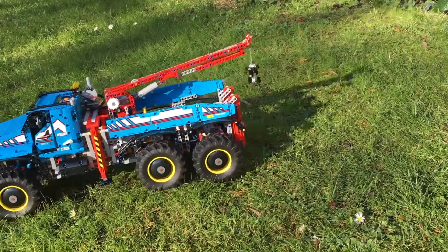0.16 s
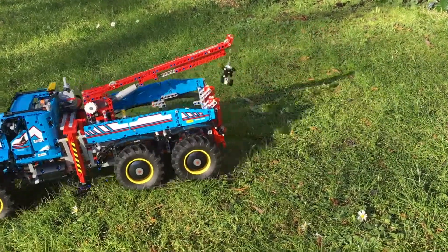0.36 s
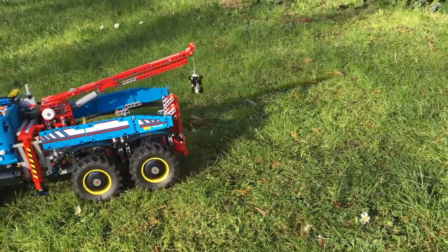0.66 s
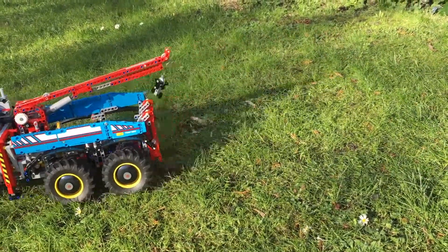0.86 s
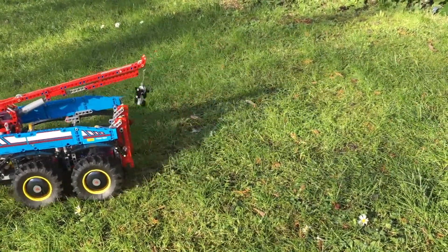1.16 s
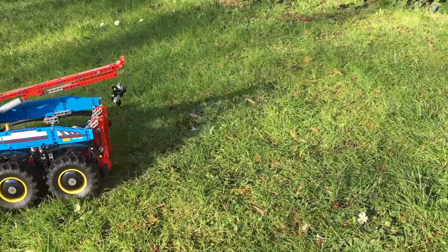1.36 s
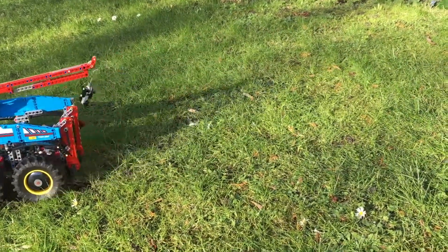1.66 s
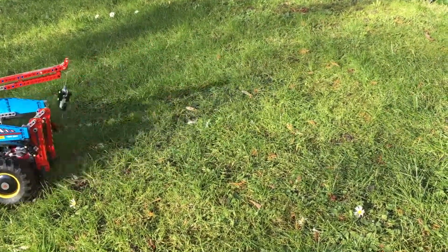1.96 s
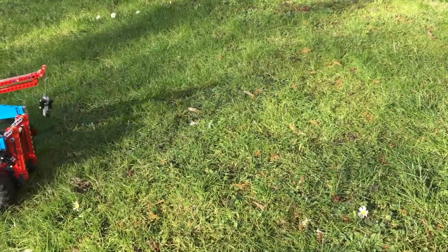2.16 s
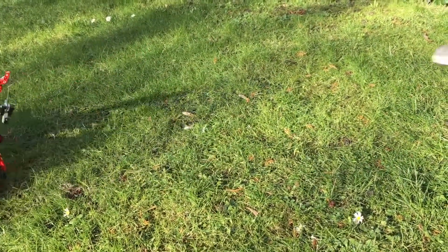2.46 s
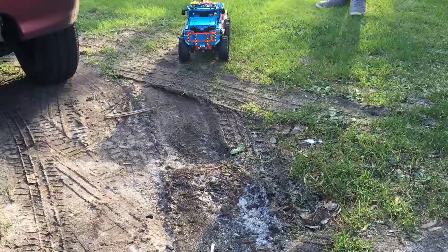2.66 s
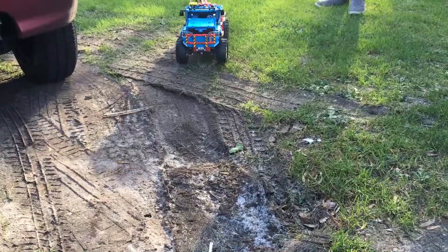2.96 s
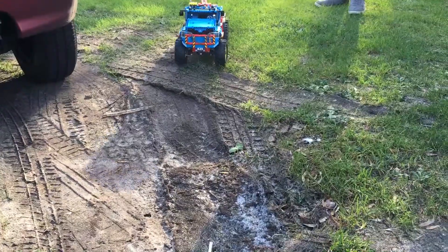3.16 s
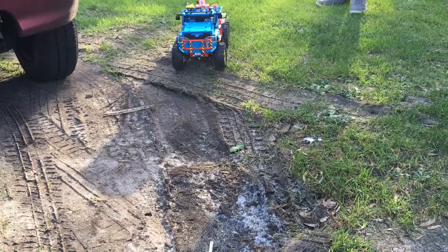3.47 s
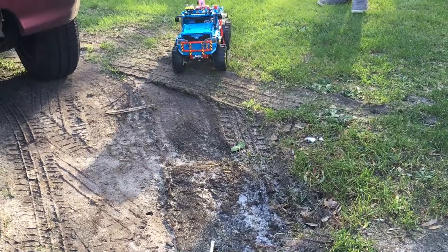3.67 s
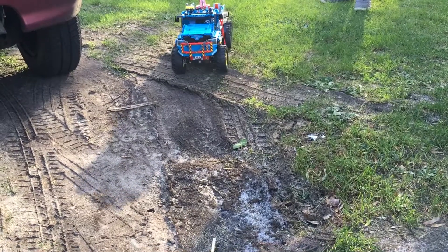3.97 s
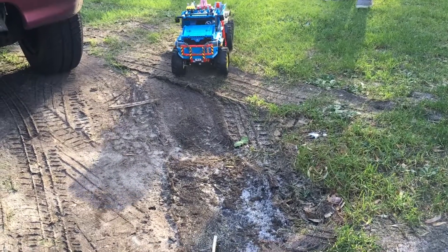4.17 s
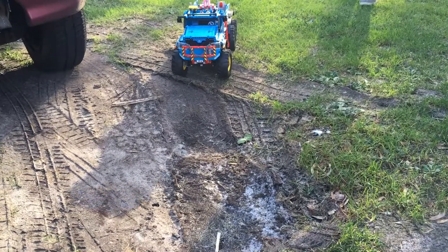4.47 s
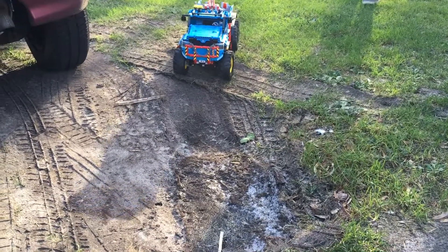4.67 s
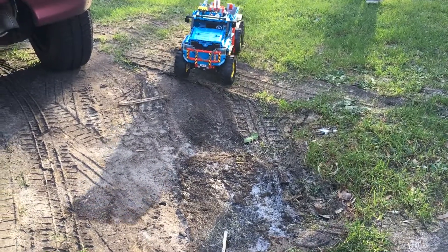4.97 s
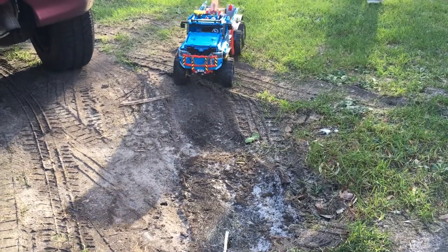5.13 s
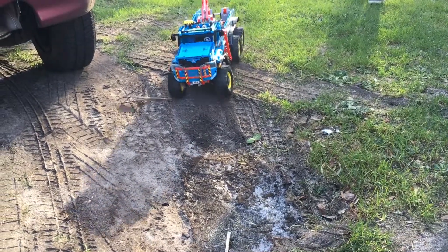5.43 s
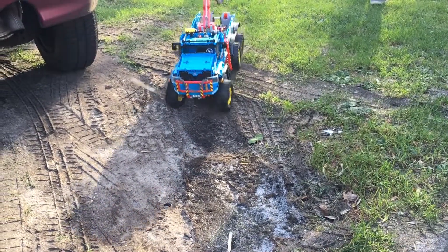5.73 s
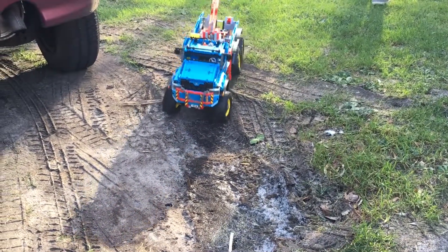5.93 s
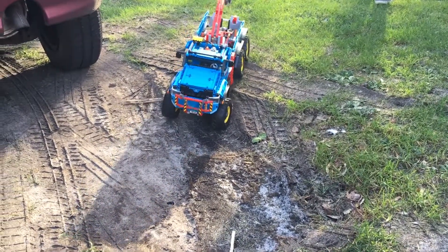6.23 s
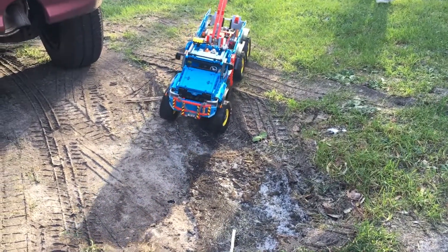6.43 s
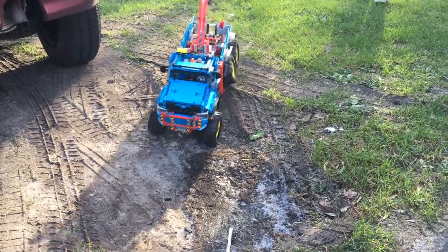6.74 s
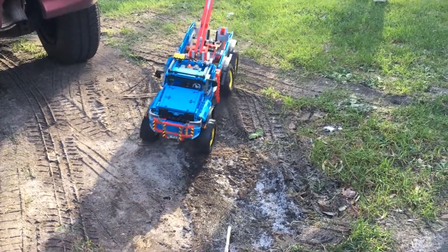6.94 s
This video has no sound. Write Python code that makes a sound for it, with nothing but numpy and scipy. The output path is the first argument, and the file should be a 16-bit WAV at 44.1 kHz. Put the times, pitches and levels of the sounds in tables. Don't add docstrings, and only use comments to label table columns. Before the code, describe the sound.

Stereo handheld microphone on a lawn: high birdsong dominates, lightly echoed by trees and walls. Left bird first, falling notes then rapid chips; a muffled double knock on the microphone; then a closer bird to the right alternates sliding rises and buzzy warbles. The left bird returns with buzzes, hooks and long trills. Toy truck wheels brush grass very quietly, growing slightly crisper with crackles of stalks and grit near the end, over faint rumble.

```python
import sys
import numpy as np
from scipy import signal
from scipy.fft import rfft, irfft
from scipy.io import wavfile
from scipy.ndimage import uniform_filter1d

SR = 44100
rng = np.random.default_rng(int(sys.argv[2]) if len(sys.argv) > 2 else 0)


def persist_wave(psi):
    counts = np.round(np.clip(psi, -1, 1) * 32767).astype(np.int16)
    wavfile.write(sys.argv[1], SR, np.atleast_2d(counts).T)


def gain_from_db(level_db):
    decades = np.asarray(level_db, float) / 20
    return 10 ** decades


N = 313110

# t/ms from the anchor, f/Hz, level/dB and, in some, warble depth/Hz
VEE = [(-32, 6100, -16, 600), (-14, 5350, -4, 600), (-2, 4400, -1, 200), (9, 3600, 0, 80),
       (19, 3200, -4, 0), (24, 2500, -18, 0), (28, 3550, -1, 0), (39, 3950, 0, 0), (45, 3900, -16, 0)]
CHIP = [(-12, 5000, -14), (-9, 4000, -4), (-6.5, 3050, -2), (0, 2820, 0), (6, 2630, -3), (9, 2300, -15),
        (19, 1500, -21)]
LEAP = [(-6, 4000, -12), (0, 7100, 0), (8, 2700, -8)]
FLOURISH = [(17, 3100, -12, 0), (22, 4050, -1, 280), (33, 4350, 0, 400), (56, 3550, -4, 430),
            (90, 3150, -7, 430), (127.5, 2900, -13, 380), (160, 2650, -21, 260)]
BUZZ = [(-14, 6500, -16, 500), (-4, 6500, 0, 550), (8, 6600, -1, 550), (14, 7200, -14, 300)]
FLICK = [(-11, 3900, -14), (-4, 5200, -3), (0, 6200, -1), (8, 5300, 0), (19, 4900, -10)]
HOOK = [(-19, 4700, -18), (-10, 4300, -12), (-5, 4300, -11), (-1, 5100, 0), (8, 5350, -4)]
ARCH = [(-13, 3800, -14, 0), (-7, 4700, 0, 0), (0, 5700, -5, 0), (8, 4700, 0, 0), (14, 3200, -8, 0),
        (23, 2800, -16, 0)]
DART = [(-6, 7200, -10), (0, 8000, 0), (5, 5500, -2), (10, 3700, -8)]
RISE = [(-55, 2830, -26), (-44, 2930, -15), (-30, 3080, -13), (-20, 3350, -8), (-8, 3720, -2), (0, 3880, 1),
        (9, 3700, 0), (12, 3300, -14), (22, 2100, -30)]
HOOKED_RISE = [(-54, 3400, -26), (-44, 3250, -14), (-30, 3620, 0), (-16, 3900, -2), (-4, 4230, 1),
               (9, 4130, 0), (14, 3700, -8), (21, 2500, -20), (26, 2100, -30)]
LONG_TAIL = [(-19, 2300, -14), (-10, 2600, -3), (0, 2900, -1), (12, 3200, 0), (24, 3250, -6),
             (30, 3150, -18)]
TICK = [(-3, 7600, -12), (0, 6500, -2), (4, 3200, -12)]
SLIDE = [(-12, 4850, -9, 100), (0, 5200, -2, 200), (16, 5500, -10, 200), (42, 6900, -15, 200)]
TAIL = [(-21, 2400, -20), (-10, 2680, -9), (0, 2880, 0), (10, 2850, -5), (19, 2700, -18)]
SPIKE = [(-9, 4900, -10), (-4, 6700, 0), (1, 9000, -16), (7, 5300, -1), (10, 4400, -6), (16, 2700, -14),
         (20, 3300, -14)]
SHORT_RISE = [(-44, 2950, -30), (-30, 3020, -17), (-16, 3200, -13), (-10, 3500, -5), (-2, 3800, -1),
              (4, 3700, 0), (8, 3450, -9), (12, 3000, -22), (18, 2200, -36)]
LINKED_RISE = [(-52, 2750, -28), (-44, 2830, -14), (-28, 3120, -9), (-15, 3500, -3), (-3, 3880, 1),
               (8, 3780, 0), (13, 3300, -8), (18, 2400, -20), (26, 2050, -26)]
ARCHED_TAIL = [(-20, 2050, -18), (-12, 2600, -1), (0, 2880, -2), (12, 2850, 0), (19, 2600, -14)]

# syllable, warble f/Hz, list of (t/s, level/dB, pitch factor, stretch factor)
LEFT_SONG = [
    (CHIP, 0, [(.941, -35, 0.99, 0.96), (6.726, -36.5, 0.97, 1.0)]),
    (HOOK, 0, [(5.082, -34, 1.12, 1.0)]),
    (LEAP, 0, [(1.030, -38, 1.0, 0.97), (6.809, -36, 1.0, 0.97)]),
    (SPIKE, 0, [(1.052, -32, 1.0, 1.0), (6.829, -34, .99, 1.0)]),
    (FLOURISH, 207, [(1.052, -28, 0.99, 1.0), (6.829, -28.5, .99, 1.0)]),
]
OTHER_CALLS = [
    (ARCH, 0, [(1.377, -37, 1.0, 1.0)]),
]
NEAR_SONG = [
    (SHORT_RISE, 0, [(2.693, -21, 1.0, 1.0)]),
    (RISE, 0, [(3.038, -18.5, 0.97, 0.95)]),
    (LINKED_RISE, 0, [(3.401, -18, 1.0, 1.08)]),
    (HOOKED_RISE, 0, [(3.755, -19.5, 1.005, 1.08), (4.141, -19, 0.995, 1.0)]),
    (TAIL, 0, [(2.740, -35, 0.84, 0.8), (3.085, -35, .80, 0.95)]),
    (ARCHED_TAIL, 0, [(3.451, -25, 1.0, 1.0)]),
    (LONG_TAIL, 0, [(3.800, -29, 1.0, 1.0), (4.191, -30, 0.97, 0.9)]),
]
# first crest t/s, length t/ms, crest f/Hz, first dip f/Hz, level/dB
WARBLES = [
    (2.836, 41, 5550, 3850, -20.5),
    (3.1842, 53, 6250, 3400, -18.8),
    (3.5492, 41, 6600, 3650, -20.5),
    (3.9165, 54, 6900, 3850, -24),
]
# top f/Hz, end f/Hz, length t/ms
GLIDES = [
    (4850, 3880, 40),
    (5100, 4200, 38),
    (6150, 4900, 44),
    (5900, 4600, 42),
]
# syllable, habit (warble f/Hz, slowing t/ms per note, pitch change per note,
# opening level/dB, stretch factor), runs (note count; first t/s, gap t/ms, level/dB, pitch factor)
LEFT_TRILLS = [
    (VEE, (172, 0.01, -.009, -.3, 1.01), [dict(count=3, run=(.023, 129.5, -29.5, 1.012)), dict(count=8, run=(5.177, 127.5, -27.8, 1.04))]),
    (CHIP, (0, .45, -.011, 1.5, .94), [dict(count=8, run=(.384, 65.9, -34, 1.05)), dict(count=8, run=(6.176, 64, -32.3, 1.04))]),
    (BUZZ, (170, -5.8, -.045, -15, .98), [dict(count=4, run=(4.300, 150.5, -31.5, 1.085))]),
    (FLICK, (0, -6.5, .001, -15, 1.01), [dict(count=4, run=(4.322, 155, -30, 1.01))]),
    (HOOK, (0, 0.01, .01, -.3, 1.01), [dict(count=4, run=(4.829, 62.3, -30.5, .998))]),
    (TICK, (0, 0.01, .001, -2.5, 1.01), [dict(count=5, run=(4.821, 62.8, -38.5, 1.01))]),
]
OTHER_TRILLS = [
    (DART, (0, 1.3, -.02, 6.5, 1.01), [dict(count=6, run=(1.972, 29, -52.5, .99))]),
    (SLIDE, (150, .4, -.004, -6.5, 1.01), [dict(count=7, run=(.535, 71, -52, 1.14)), dict(count=6, run=(1.415, 75, -46, 1.02))]),
]
# start t/s, end t/s, first f/Hz, last f/Hz, level/dB
WHISTLES = [(.74, .92, 6150, 6050, -56), (2.20, 2.36, 6570, 6520, -52), (2.21, 2.42, 5700, 5620, -55),
            (2.44, 2.60, 6350, 6300, -53), (3.12, 3.53, 5750, 5650, -46), (3.165, 3.34, 6850, 6550, -39),
            (3.35, 3.52, 6800, 6450, -43), (5.32, 5.53, 2520, 2480, -57), (5.79, 6.02, 2480, 2380, -59),
            (6.34, 6.68, 5430, 5430, -46), (6.66, 6.82, 5430, 5400, -55), (6.73, 6.82, 5150, 4700, -55),
            (6.27, 6.42, 2420, 2400, -55), (6.84, 7.08, 2420, 2380, -57), (5.04, 5.14, 3400, 3250, -55),
            (2.45, 2.58, 5100, 5050, -56), (2.86, 3.10, 1580, 1680, -68), (3.52, 3.80, 1560, 1720, -68),
            (3.95, 4.55, 1720, 1520, -69), (2.08, 2.22, 1720, 1700, -67)]
# f/Hz, level/dB
CHORUS_TONE = [(530, -52), (900, -23.5), (1670, -12.5), (2700, -7), (3050, 3), (4540, -0.5), (5100, -8.5),
               (6300, 1), (9000, -26), (11700, -58), (19800, -120)]
# t/s, level/dB
CHORUS_LEVEL = [
    (0.0, -49),
    (.45, -55),
    (1.2, -50.5),
    (2.0, -55),
    (2.8, -55),
    (3.6, -59),
    (5.3, -54),
    (5.8, -63),
    (7.1, -55),
]
# t/s, level/dB
TRUCK_PUSH = [(0.0, -63), (.43, -60), (.91, -60), (1.2, -65), (1.9, -66), (2.12, -60.5), (2.49, -66.5),
              (2.9, -59.5), (3.4, -65), (3.6, -59), (4.39, -58), (4.61, -63), (5.14, -62.5), (5.4, -55),
              (5.71, -52), (6.17, -54.5), (6.5, -59), (6.76, -54)]
# f/Hz, level/dB
RUSTLE_TONE = [(350, -11), (700, -11), (1500, -2.5), (3000, -1), (6000, 7), (8800, -2), (10300, -3),
               (12000, 0.5), (15500, -7)]
# t/s, level/dB, length t/s
DRAGS = [
    (1.2, -58, .2),
    (2.12, -60, .12),
    (2.6, -59, .1),
    (3.4, -57, .12),
    (4.1, -66, .5),
    (5.35, -55, .15),
    (6.55, -58, .1),
    (6.73, -51, .05),
    (7.08, -59, .15),
]
# t/s, level/dB
SNAPS = [(2.6394, -49), (5.1926, -35), (5.2809, -40.5), (6.0871, -44), (6.5165, -49.5), (6.704, -45),
         (6.738, -50), (6.762, -46), (6.8195, -36), (7.089, -39), (.0847, -51), (1.0226, -52),
         (1.6516, -54), (2.0208, -52), (4.2143, -51), (4.5082, -53), (4.8983, -52), (6.7166, -45)]
# t/s, level/dB
SCUFFS = [
    (5.279, -47),
    (5.389, -48),
    (6.649, -47),
    (6.686, -47),
    (6.703, -44),
    (6.765, -45),
    (6.949, -47),
]
# t/s, level/dB, body f/Hz, length t/ms, rub level/dB
BUMPS = [(1.011, -41.5, 123.6, 13, -65), (1.127, -32.5, 144, 12, -46.5), (1.149, -26, 121, 8, -43.5),
         (1.177, -25, 148, 16, -49), (1.205, -40, 156, 27, -51.5), (1.275, -39.5, 146, 25, -54),
         (1.302, -42, 103, 15, -66), (1.410, -48, 136, 34, -66), (1.945, -49, 141, 22, -59),
         (2.022, -47.5, 152, 22, -56.5), (2.631, -54, 186, 19, -52.5), (6.730, -75, 304, 42, -63.5)]
# f/Hz, level/dB
RUB_TONE = [(150, -3.5), (370, 1), (520, -7), (1000, -18), (2500, -19.5), (4000, -43)]
# f/Hz, level/dB
FIRST_RUMBLE = [(15, -72), (25, -48), (48, -14), (72, -4), (147, 0), (222, -5), (444, -11), (981, -27),
                (1300, -41.5), (1690, -64), (2860, -120)]
# f/Hz, level/dB
SECOND_RUMBLE = [(12, -49), (20, -8), (59, -1), (113, -9), (215, -14), (363, -28.5), (635, -30), (756, -41),
                 (1300, -48.5), (1690, -57), (2860, -120)]


def near_bird():
    out = song(NEAR_SONG)
    lead_ms, release_ms, join_ms, settle_ms = 4, 8, 6, 16
    for (s, warble_ms, crest_hz, dip_hz, level_db), (top_hz, end_hz, glide_ms) in zip(WARBLES, GLIDES):
        ms = np.arange(-lead_ms, warble_ms + glide_ms + release_ms, .25)
        done = np.clip(ms / warble_ms, 0, 1)
        after = np.maximum(ms - warble_ms, 0)
        down = np.abs(np.sin(np.pi * 69.5 * ms / 1000)) ** 1.3
        dip_depth_hz = crest_hz - dip_hz - 1250 * done ** 1.6
        crest_fall_hz = .6 * (crest_hz - top_hz) * done ** 4.0
        warble = crest_hz - dip_depth_hz * down - crest_fall_hz * (1 - down)
        glide = end_hz + (top_hz - end_hz) * np.exp(-after / settle_ms * (top_hz / 5400) ** 2)
        joined = np.clip(1 + (ms - warble_ms) / join_ms, 0, 1)
        swell_db = -7 * (1 - done) ** 2.6 - 2.5 * after / glide_ms
        swell_db += 2.5 * np.minimum(ms - 2.5, 0)
        swell_db -= 18 * np.maximum(after - glide_ms, 0) / release_ms
        swell_db -= 9.5 * (1 - joined) * ((warble - 5150) / 1300) ** 2
        pitch_hz = warble + (glide - warble) * joined
        add_syllable(out, s + ms / 1000, pitch_hz, level_db + swell_db, 0 * ms, 0, third_db=7.5, size=50)
    return out


def left_bird():
    return song(LEFT_SONG + trills(LEFT_TRILLS))


def other_birds():
    return song(OTHER_CALLS + trills(OTHER_TRILLS))


def song(phrases):
    out = np.zeros(N)
    for shape, warble_hz, notes in phrases:
        ms, hz, level_db, *warble = np.transpose(shape)
        depth_hz = np.abs(warble[0]) if warble else 0 * ms
        for s, peak_db, pitch, stretch in notes:
            add_syllable(out, s + stretch * ms / 1000, pitch * hz, peak_db + level_db, depth_hz, warble_hz)
    return out


def trills(table):
    phrases = []
    for shape, (warble_hz, slowing_ms, pitch_change, opening_db, stretch), runs in table:
        for row in runs:
            s, gap_ms, level_db, pitch = row["run"]
            notes = []
            for k in range(row["count"]):
                start = s + k * (gap_ms + k * slowing_ms) / 1000
                notes.append((start, level_db + opening_db / 2 ** k, pitch + k * pitch_change, stretch))
            phrases.append((shape, warble_hz, notes))
    return phrases


def add_syllable(out, s, hz, level_db, depth_hz, warble_hz, third_db=11.0, size=130):
    at = np.arange(max(int(s[0] * SR), 0), min(int(s[-1] * SR), N))
    t = at / SR
    swing = 1 - 2 * np.abs(np.sin(np.pi * warble_hz * (t - s[0]))) ** 1.5
    gain = gain_from_db(np.interp(t, s, level_db))
    glide = uniform_filter1d(np.interp(t, s, hz), size=size, mode="nearest")
    phase = 2 * np.pi * np.cumsum(glide + np.interp(t, s, depth_hz) * swing) / SR
    tone = np.sin(phase) + gain_from_db(-44) * np.sin(2 * phase)
    tone += gain_from_db(third_db) * gain ** 2 * np.sin(3 * phase)
    out[at] += gain * signal.windows.tukey(len(at), .1) * tone


def place(x, left_db, right_db, echo_left_db, lag, echo_db, early_db, slap_db, flicker_db):
    t = np.arange(int(1.2 * SR)) / SR
    strength = gain_from_db(echo_db - 60 * t / 0.83) * np.minimum(t / 0.049, 1)
    strength += gain_from_db(early_db - 60 * t / 0.095)
    strength += gain_from_db(slap_db) * np.exp(-((t - 0.1247) / 0.0024) ** 2)
    scatter = strength * rng.standard_normal((2, len(t)))
    echoes = signal.fftconvolve(x[None], scatter, axes=1)[:, :N]
    echoes = highpass(echoes, 2700) * gain_from_db(1.2)
    echoes *= gain_from_db(echo_left_db / 2 * np.array([[1], [-1]]))
    x = x * gain_from_db(flicker_db * drift(260))
    right = np.interp(np.arange(N) - lag, np.arange(N), x)
    return np.array([x, right]) * gain_from_db(np.array([[left_db], [right_db]])) + echoes


def whistles():
    out, t = np.zeros((2, N)), np.arange(N) / SR
    shiver = gain_from_db(5 * np.array([drift(130), drift(130)]))
    wobble = 1 + .008 * drift(200)
    for start, end, first_hz, last_hz, level_db in WHISTLES:
        at = slice(int(start * SR), int(end * SR))
        pitch_hz = np.interp(t[at], [start, end], [first_hz, last_hz]) * wobble[at]
        phase = 2 * np.pi * np.cumsum(pitch_hz) / SR
        sides = np.sin(phase + [[first_hz / 2500], [0]]) * gain_from_db(level_db)
        out[:, at] += sides * shiver[:, at] * signal.windows.tukey(len(phase), .25)
    return out


def rustle():
    sizes = gain_from_db(4.0 * np.minimum(rng.exponential(1, N), 5)) * rng.choice([-1, 1], N)
    clicks = rms_one(sizes * (rng.random(N) < 400 / SR))
    clicks = rms_one(highpass(clicks, 7000))
    blades = coloured(RUSTLE_TONE)[0] * gain_from_db(1.8 * drift(9))
    gear_tone = coloured([(8100, -20), (8500, 0), (9100, 0), (9500, -20)])[0]
    gears = gain_from_db(-13 + 3.5 * drift(8)) * gear_tone
    pause_db = -11 * np.exp(-((np.arange(N) / SR - 6.43) / 0.125) ** 4)
    return gain_from_db(curve(TRUCK_PUSH) + pause_db + 5.0) * (gain_from_db(-10.5) * clicks + blades + gears)


def scrape():
    t = np.arange(N) / SR
    strength = gain_from_db(-76)
    for s, level_db, length in DRAGS:
        strength = strength + gain_from_db(level_db) * np.exp(-((t - s) / length) ** 2)
    tone = coloured([(400, -6), (800, -6), (1600, -10), (2600, 8)])[0]
    return gain_from_db(-4.5) * strength * tone * gain_from_db(2.2 * drift(8.9))


def snaps():
    return cracks(SNAPS, -3, .03) * coloured([(1000, -6), (6000, -5), (12000, 9.5), (16000, 4)])[0]


def scuffs():
    return cracks(SCUFFS, -8, .05) * coloured([(450, -3), (1000, 0), (2200, -4)])[0]


def knock():
    out, t = np.zeros(N), np.arange(N) / SR
    rub = coloured(RUB_TONE)[0]
    for s, peak_db, hz, ms, rub_db in BUMPS:
        swell = np.exp(-((t - s) * 1000 / ms) ** 2)
        out += swell * gain_from_db(peak_db) * np.cos(2 * np.pi * hz * (t - s))
        out += np.sqrt(swell) * gain_from_db(rub_db) * rub
    return out


def far_chorus():
    return gain_from_db(curve(CHORUS_LEVEL)) * coloured(CHORUS_TONE, rows=2) * gain_from_db(1.8 * drift(18))


def rumble():
    gusts = gain_from_db(2.0 * drift(12))
    moved = np.arange(N) / SR > 2.668
    spots = np.where(moved, coloured(SECOND_RUMBLE)[0], coloured(FIRST_RUMBLE)[0])
    return gusts * gain_from_db(-56.5) * spots


def cracks(table, trim_db, fall_s):
    out, t = np.zeros(N), np.arange(N) / SR
    for s, peak_db in table:
        out += gain_from_db(peak_db + trim_db - 60 * np.maximum(t - s, 0) / fall_s) * (t >= s)
    return out


def coloured(points, rows=1):
    hz, level_db = np.transpose(points)
    grid = np.maximum(np.arange(N // 2 + 1) * SR / N, 1)
    shape_db = np.interp(np.log(grid), np.log(hz), level_db)
    shape_db -= 30 * (np.maximum(np.log2(hz[0] / grid), 0) + np.maximum(np.log2(grid / hz[-1]), 0))
    return rms_one(irfft(rfft(rng.standard_normal((rows, N))) * gain_from_db(shape_db), N))


def drift(rate):
    knots = rng.standard_normal(int(N / SR * 400) + 2)
    return np.interp(np.arange(N) * min(rate, 400) / SR, np.arange(len(knots)), knots)


def curve(rows):
    return np.interp(np.arange(N) / SR, *np.transpose(rows))


def highpass(x, hz):
    return signal.sosfilt(signal.butter(2, hz, "high", fs=SR, output="sos"), x)


def rms_one(x):
    return x / np.sqrt(np.mean(x ** 2) + 1e-20)


def scene():
    birds = place(near_bird(), left_db=-3.5, right_db=1.5, echo_left_db=1.0, lag=6.27,
                  echo_db=-46.5, early_db=-40, slap_db=-49, flicker_db=1.5)
    birds += place(left_bird(), left_db=0.0, right_db=-24, echo_left_db=6.5, lag=3.0,
                   echo_db=-41.5, early_db=-34, slap_db=-50, flicker_db=2.5)
    birds += place(other_birds(), left_db=0.0, right_db=-2, echo_left_db=1.5, lag=1.0,
                   echo_db=-45, early_db=-36, slap_db=-48, flicker_db=2.0)
    truck = rustle() + scrape() + snaps() + scuffs()
    return birds + whistles() + truck + knock() + far_chorus() + rumble()


def roll_off(x):
    return signal.sosfilt(signal.butter(12, 16490, fs=SR, output="sos"), x)


def record(dry):
    dry = highpass(dry, 32)
    dry = signal.sosfilt(signal.cheby2(20, 60, 16050, fs=SR, output="sos"), dry)
    mid, side = (dry[0] + dry[1]) / 2, (dry[0] - dry[1]) / 2
    side = signal.sosfiltfilt(signal.butter(2, 620, "high", fs=SR, output="sos"), side)
    return roll_off(np.array([mid + side, mid - side]))


dry = scene()
out = record(dry)
persist_wave(out)
```